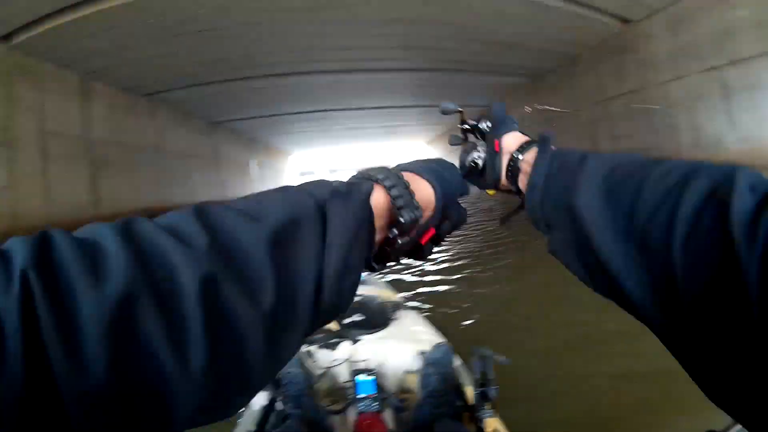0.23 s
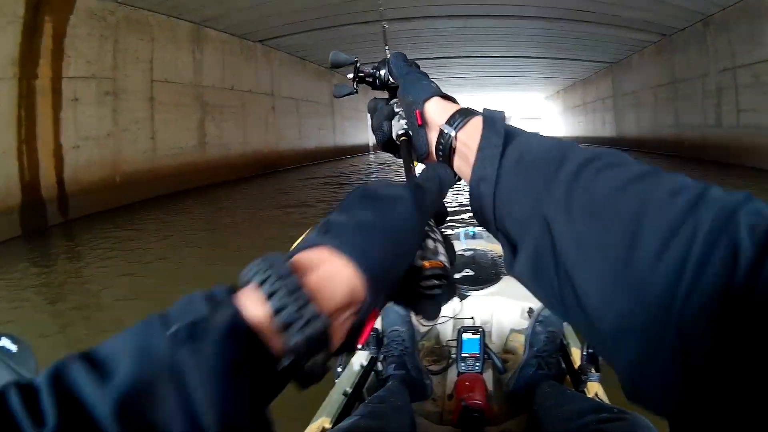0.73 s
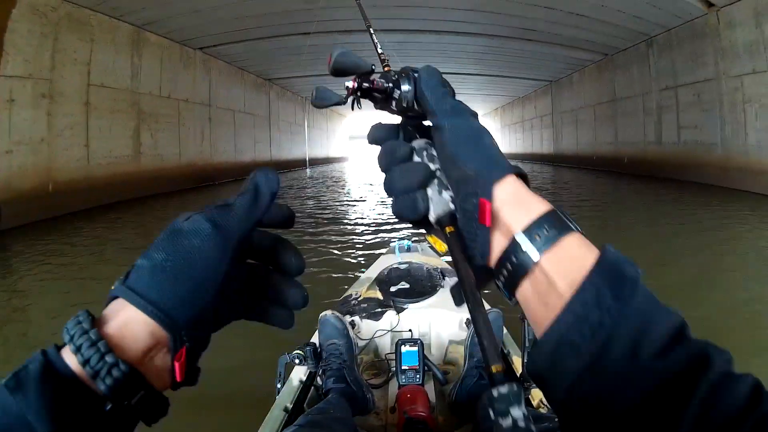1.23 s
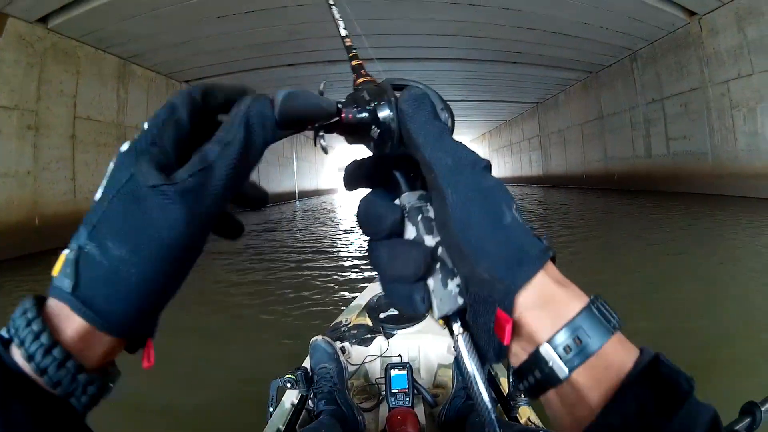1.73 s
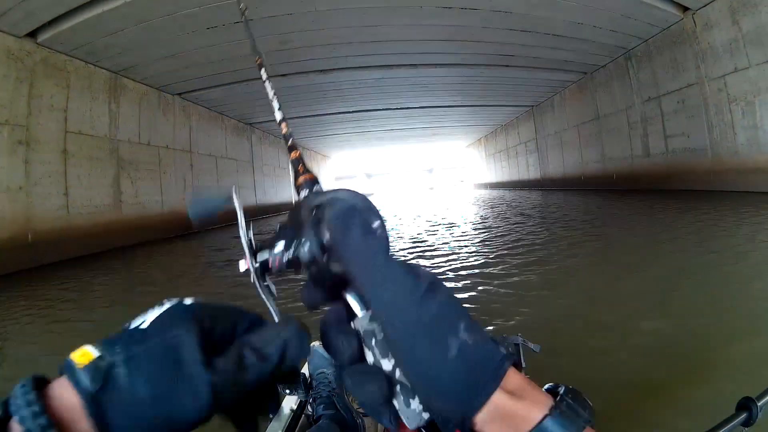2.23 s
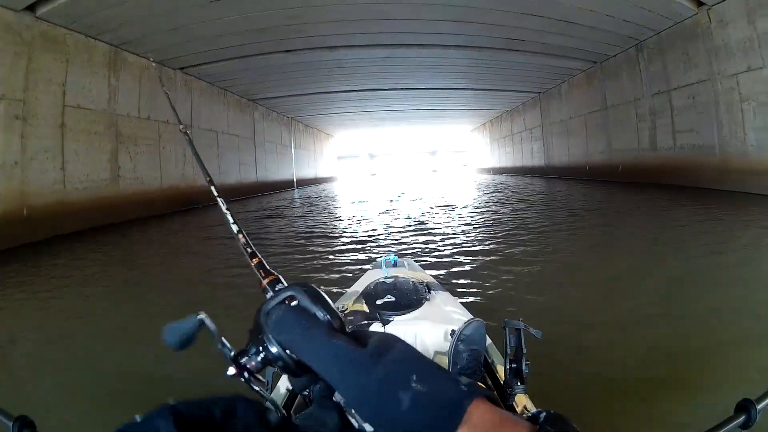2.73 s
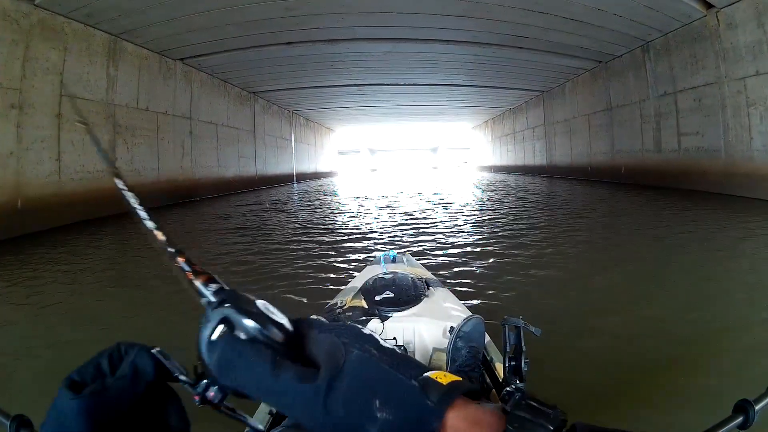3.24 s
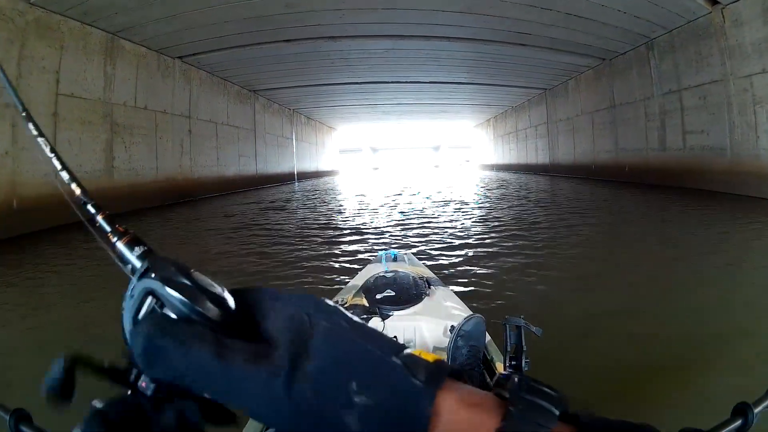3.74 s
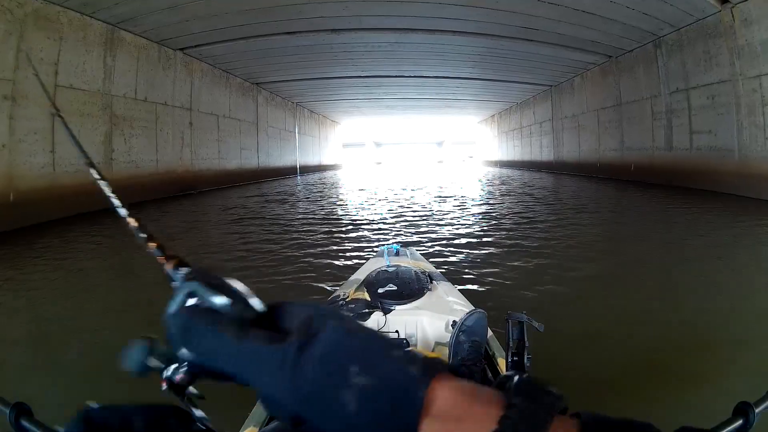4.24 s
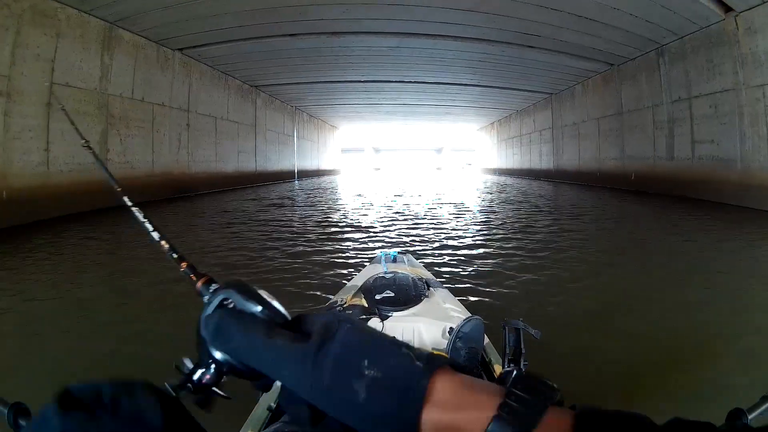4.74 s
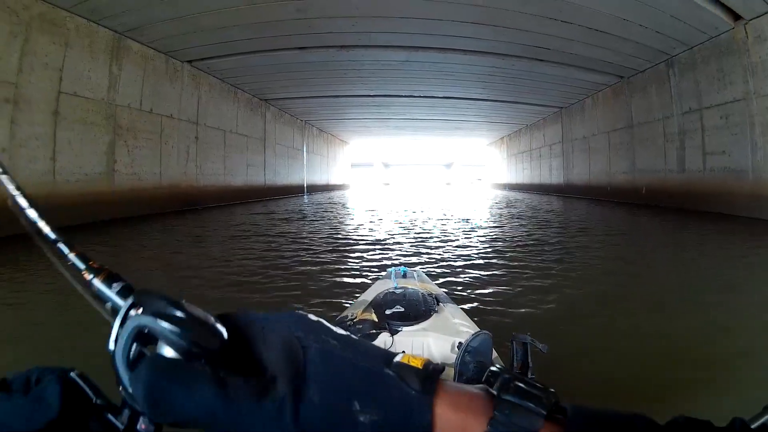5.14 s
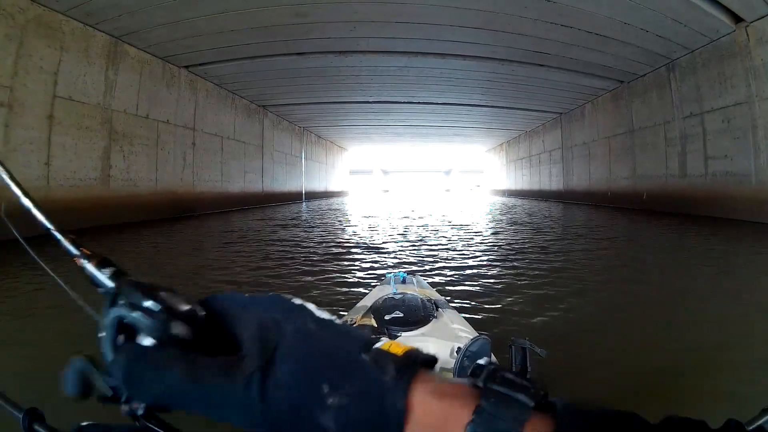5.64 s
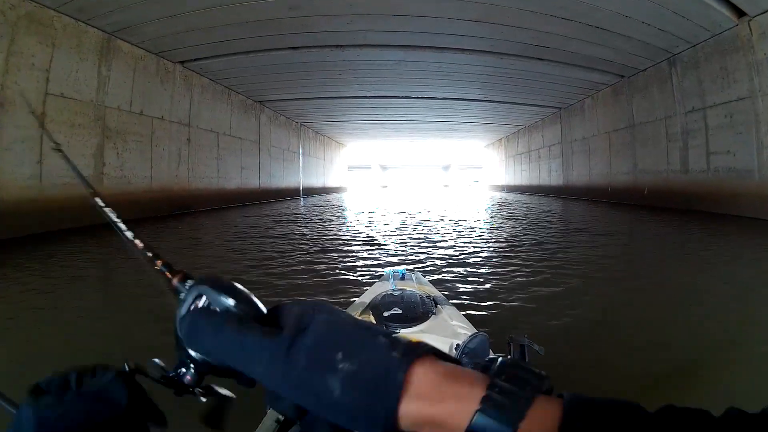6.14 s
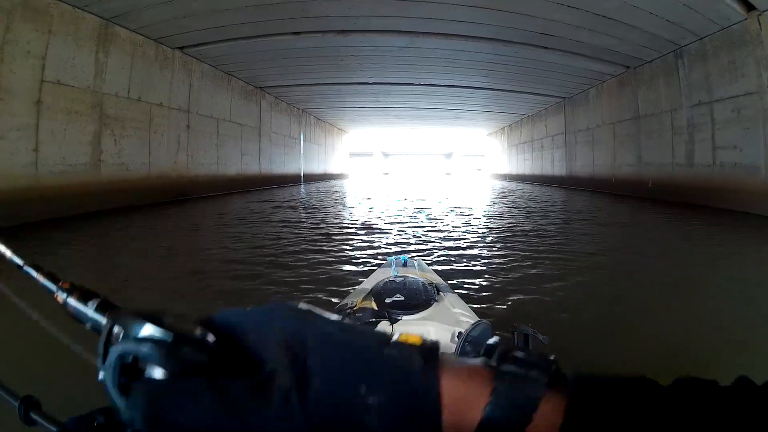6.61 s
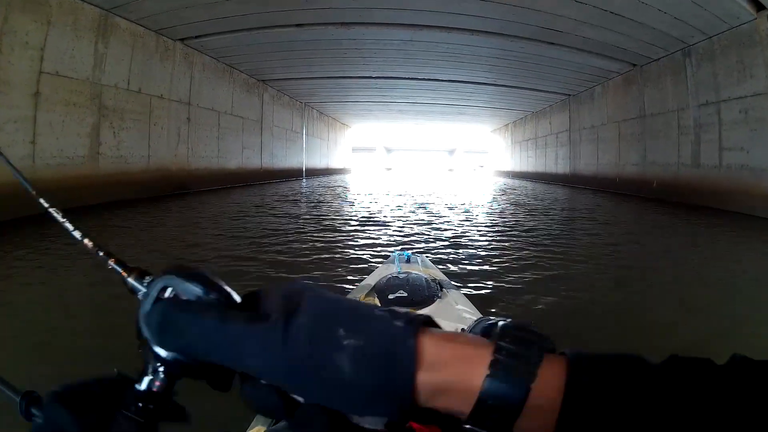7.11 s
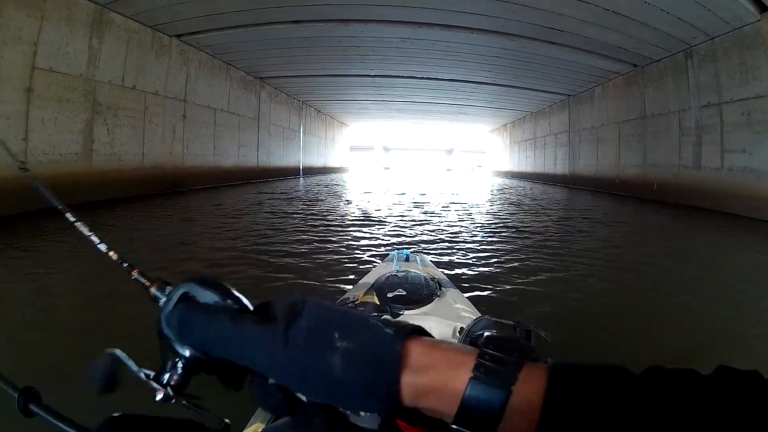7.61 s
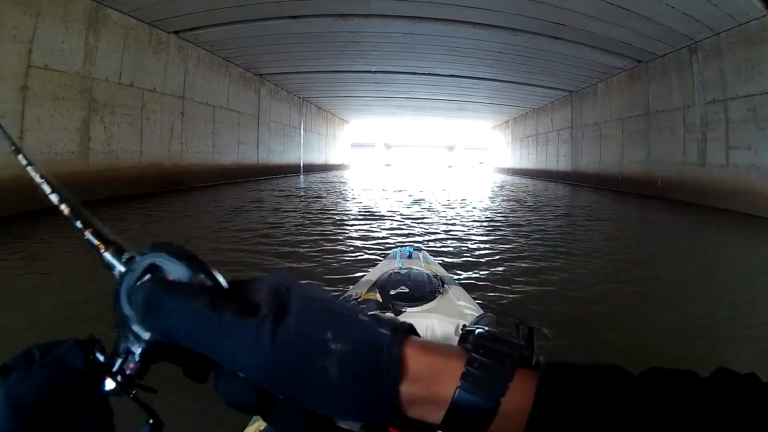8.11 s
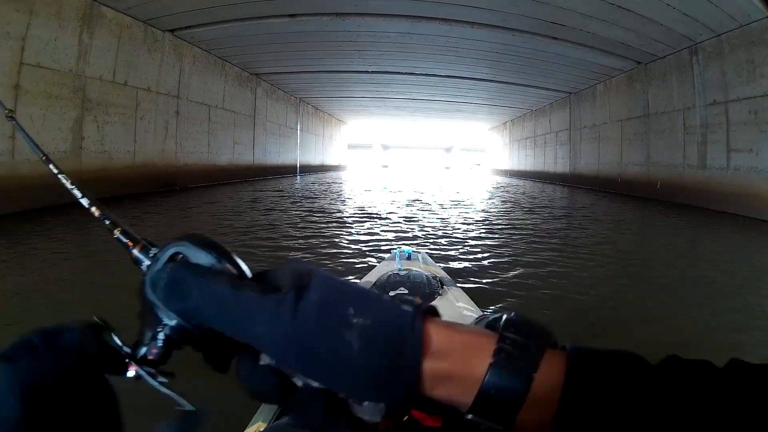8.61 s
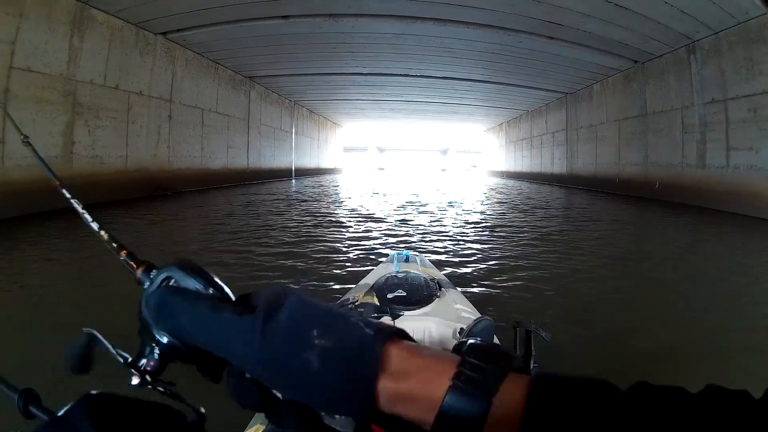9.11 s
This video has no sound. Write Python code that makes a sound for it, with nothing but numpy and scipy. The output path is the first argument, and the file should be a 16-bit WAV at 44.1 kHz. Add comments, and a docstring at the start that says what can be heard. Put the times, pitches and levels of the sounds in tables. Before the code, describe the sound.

A loud, steady rumble of traffic overhead fills a concrete tunnel, deep and droning with wavering engine hum. At the start a rod swing brings sleeve rustle, a dull boat thump and a hard knock, then line hisses out with rapid uneven spool ticks. Later only scattered reel clicks and knocks poke through. A body-worn camera adds hiss, a faint high whine and crackling overload.

```python
"""Traffic rumbles and drones through a concrete underpass, while an angler casts from a small boat.
The rod swishes, the boat thumps, line hisses out with quick spool ticks, and the reel and tackle knock.
Traffic, cast, line and glove are shaped noise, plus a wavering hum for the engines; each knock or tick
is a short burst that rings the reel's resonances. The chest-worn camera colours the steady sound,
adds hiss and a thin whine, clips the highest crests and cuts off the very top."""
import sys
import numpy as np
from scipy import signal
from scipy.fft import rfft, irfft, next_fast_len
from scipy.io import wavfile
from scipy.ndimage import uniform_filter1d, minimum_filter1d, map_coordinates

SR = 44100
rng = np.random.default_rng(int(sys.argv[2]) if len(sys.argv) > 2 else 0)


def to_wav(s):
    """Save 16-bit WAV."""
    ch = np.atleast_2d(s).T  # columns
    pcm = np.round(np.clip(ch, -1, 1) * 32767)  # PCM
    wavfile.write(sys.argv[1], SR, pcm.astype(np.int16))


N = 412776


def amp(db):
    """Turns decibels into a gain."""
    return 10 ** (np.asarray(db) / 20)


def unit(x):
    """Scales a sound to rms 1."""
    return x / np.sqrt(np.mean(x ** 2) + 1e-20)


def along(points, hz):
    """Reads a curve of (frequency, value) points on a logarithmic frequency axis."""
    f, v = np.transpose(points)
    return np.interp(np.log(hz + 1), np.log(f + 1), v)


def curves(rows):
    """Joins table rows over time: one curve for each column after the time."""
    times, *columns = np.transpose(rows)
    return [np.interp(np.arange(N) / SR, times, column) for column in columns]


def bumps(rows):
    """Adds up bell-shaped rises or dips, each (time, half length, height)."""
    t = np.arange(N) / SR
    return sum(height * np.exp(-((t - s) / half) ** 2) for s, half, height in rows)


def wobble(rate):
    """Draws a smooth random curve with `rate` random points a second."""
    return map_coordinates(rng.standard_normal(int(N * rate / SR) + 4), [np.arange(N) * rate / SR])


def filtered(x, response):
    """Multiplies the spectrum of a sound by a response to frequency."""
    m = next_fast_len(N + 8192)
    return irfft(rfft(x, m) * response(np.fft.rfftfreq(m, 1 / SR)), m)[:N]


def peak(f, hz, width):
    """Gives the strength of a resonance of height 1 at each frequency."""
    return np.abs(f * width / (hz * hz - f * f + 1j * f * width))


def rush(response, patchy_db):
    """Makes filtered noise of rms 1 whose gain varies in random patches of time and pitch."""
    z = signal.stft(rng.standard_normal(N), nperseg=512)[2]
    patches = uniform_filter1d(rng.standard_normal(z.shape), 5, 0)  # smooth across pitch
    patches = uniform_filter1d(patches, 14, 1)  # smooth across time
    noise = signal.istft(z * amp(patchy_db * unit(patches)), nperseg=512)[1][:N]
    return unit(filtered(noise, response))


def camera():
    """A steady hiss briefly grows louder five times, about once a second; electronics whine in two tones."""
    # hiss colour: (frequency [Hz], relative level [dB per Hz])
    hiss_colour = [(2350, -30.5), (4000, 1), (4290, -5.5), (6370, -9), (7030, -10), (7230, -10),
                   (14000, -12), (15800, -20)]
    # slow level of the hiss, to which the brief louder moments are added: (time [s], level [dB])
    hiss_level = [(0, -67), (1, -67), (2, -69.5), (3.4, -65), (4.9, -70), (6.2, -67.5), (6.6, -62.5),
                  (9.36, -65)]
    # average whine: (frequency [Hz], rms level [dB])
    whine_tones = [(6804, -72.5), (13608, -90)]
    first_s, gap_s, half_s, louder_by_db = 1.44, 1.008, .07, 3
    whine_follows = 0.44  # dB of whine for each dB of slow hiss change
    whine_rise = 1  # dB per second
    t = np.arange(N) / SR
    louder_db = sum(louder_by_db * np.exp(-((t - first_s - k * gap_s) / half_s) ** 4) for k in range(5))
    level_db, = curves(hiss_level)
    hiss = amp(level_db + louder_db) * rush(lambda f: amp(along(hiss_colour, f)), patchy_db=1)
    drift_db = whine_rise * (t - t.mean()) + whine_follows * (level_db - level_db.mean())
    whine = np.zeros(N)
    for hz, db in whine_tones:
        loudness = np.sqrt(2) * amp(db + drift_db + .8 * wobble(8))  # the root turns rms into peak
        whine += loudness * np.sin(2 * np.pi * hz * t + .3 * wobble(12))
    return hiss + whine


def traffic():
    """Wheels shake the deck; the tunnel's long echo smooths the noise into a drone with fixed resonances."""
    # colours of deep shudder, roar and tyre hiss: (frequency [Hz], relative level [dB per Hz])
    shudder_colour = [(8.8, -38), (15, -10.5), (43, 0), (68, 1), (108, -7), (190, -6.5), (250, -36.5),
                      (420, -120)]
    roar_colour = [(76, -41), (130, -11), (183, -8.5), (222, -6), (280, -4), (357, -4.5), (538, -3.5),
                   (763, -10.5), (1100, -29), (1430, -49.5), (2420, -120)]
    tyre_colour = [(470, -24.5), (800, 1.5), (1140, -9.5), (1380, -11), (1570, -17.5), (2290, -30),
                   (2600, -30.5), (3060, -41.5), (3740, -43.5), (6330, -57), (7000, -58), (9100, -72),
                   (15400, -120)]
    # the deck's main resonance: (frequency [Hz], width [Hz], level [dB])
    slab_modes = [(228.4, 26, 0)]
    # resonances across the tunnel that shape the roar: (frequency [Hz], width [Hz], lift or dip [dB])
    tunnel_modes = [(302, 30, 0.5), (360.6, 43, 5), (420, 49, -1), (541, 21, 3.5), (610, 10, 4)]
    # traffic overhead, before small random wavering: (time [s], roar level [dB], tyre hiss level [dB])
    flow = [(0, -21, -33), (.5, -17.5, -51.5), (1.1, -15, -29.5), (1.5, -17, -34), (2.3, -16.5, -32),
            (2.8, -13.5, -32), (3.15, -16.5, -32.5), (3.4, -15.5, -27), (4.2, -14.5, -28.5),
            (4.9, -14.5, -29.5), (5.25, -16.5, -31.5), (6.2, -17, -32.5), (6.6, -17, -28),
            (7.55, -14.5, -27), (8.2, -16.5, -30), (8.55, -15, -29.5), (8.95, -16.5, -29.5),
            (9.36, -18, -33.5)]
    # swells of the slab drone: (time [s], half length [s], rise [dB])
    drone_swells = [(.35, 0.22, 4.5), (1.3, 0.26, 2), (2.3, 0.33, 4.5), (3.15, 0.066, 6), (5.1, 0.53, 5.5),
                    (6.1, 0.27, 4), (7.65, 0.21, 4.5), (8.3, 0.26, 0.5), (9.1, 0.46, 3.5)]
    # surges of the engine hum: (time [s], half length [s], rise or dip [dB])
    hum_surges = [(.4, 0.18, 4), (1.12, 0.13, 11.5), (1.9, .2, 6), (2.5, .15, 4), (3.4, .4, -2.5),
                  (4.95, 0.22, 4.5), (5.37, .1, 13), (5.89, .25, 10.5), (6.29, .1, 15), (7.3, 0.38, 9),
                  (8.05, 0.21, 11), (9.13, .15, 6.5)]
    # a heavy vehicle lifts the shudder: (time [s], half length [s], rise [dB])
    heavy_vehicle = [(5.9, 0.61, 3.5)]
    shudder_start_db, shudder_fade = -22, 0.47  # the fade is in dB per second
    slab_db, hum_db, hum_hz = -24, -31, 41.7  # before swells, surges and wavering

    roar_db, tyre_db = curves(flow)
    pitch = hum_hz * (1 + .12 * wobble(9))  # many engines: the note wavers
    hum_level = amp(hum_db + bumps(hum_surges) + 3.6 * wobble(16))
    hum = hum_level * np.sin(2 * np.pi * np.cumsum(pitch) / SR)

    shudder_db = shudder_start_db - shudder_fade * np.arange(N) / SR + bumps(heavy_vehicle)
    shudder = amp(shudder_db) * rush(lambda f: amp(along(shudder_colour, f)), patchy_db=-0.5)

    def slab_response(f):
        return sum(amp(db) * peak(f, hz, w) ** 2 for hz, w, db in slab_modes)

    slab = amp(slab_db + bumps(drone_swells)) * rush(slab_response, patchy_db=1.14)

    def roar_response(f):
        modes_db = sum(db * peak(f, hz, w) ** 2 for hz, w, db in tunnel_modes)
        return amp(along(roar_colour, f) + modes_db)

    roar = amp(roar_db + 0.76 * wobble(7.5)) * rush(roar_response, patchy_db=0.87)
    tyre_level = amp(tyre_db + 0.37 * wobble(9))
    tyres = tyre_level * rush(lambda f: amp(along(tyre_colour, f)), patchy_db=1.27)
    return hum + shudder + slab + roar + tyres


def cast():
    """Sleeves and line rustle and the boat thumps under the swing; both build up, then sink to a trace."""
    # rustle colour: (frequency [Hz], relative level [dB per Hz])
    rustle_colour = [(710, -44.5), (1200, -4), (1570, -4.5), (1800, -8), (2200, -13), (2720, -24),
                     (4180, -31.5), (9000, -45), (11700, -69.5), (19800, -120)]
    start_s, rise_s, hold_s, fall_s = 0, 0.11, 0.68, 0.35
    rustle_db, thump_db = -35, -15  # before the gain of the swing
    times = np.cumsum([start_s, rise_s, hold_s, fall_s])
    swing_gain, = curves(np.transpose([times, [0.022, 0.84, 0.62, 0.057]]))
    grainy = amp(2.8 * wobble(90))
    rustle_noise = rush(lambda f: amp(along(rustle_colour, f)), patchy_db=1.5)
    rustle = amp(rustle_db) * unit(grainy * rustle_noise)
    thump = amp(thump_db) * rush(lambda f: peak(f, 68, 70) ** 2, patchy_db=1.0)
    return swing_gain * (rustle + thump)


def crested(rumble):
    """A smooth limit holds the rumble's waves down; here and there they pile up into one tall crest."""
    # crests, before the final clipping: (time [s], height [0-1 of full scale])
    crests = [(1.280, .76), (1.421, .75), (1.582, 0.9), (1.839, .74), (1.859, .75), (2.479, .75),
              (3.428, .92), (4.043, .87), (4.160, .77), (4.667, .86), (4.678, .77), (5.019, .77),
              (5.378, .93), (5.936, .75), (6.291, .76)]
    limit = .725  # of full scale
    t = np.arange(N) / SR
    room = np.minimum(1, limit / (np.abs(rumble) + 1e-9))
    rumble = rumble * uniform_filter1d(minimum_filter1d(room, size=201), size=151)
    for s, height in crests:
        near = slice(round((s - .003) * SR), round((s + .003) * SR))
        from_crest = t[near] - s
        pull = np.exp(-(from_crest / 0.0012) ** 4)  # 1 at the crest, 0 well away from it
        side = np.sign(rumble[round(s * SR)])
        crest = height * side * np.cos(2 * np.pi * 420 * from_crest)
        rumble[near] = (1 - pull) * rumble[near] + pull * crest
    return rumble


def glove():
    """A glove brushes softly on the rod grip: grainy noise, strongest near 5 kHz."""
    # strokes: (time [s], half length [s], level [dB])
    scuffs = [(0.094, 0.13, -57.5), (3.2, .04, -64), (3.55, 0.015, -61.5), (7.678, 0.065, -60),
              (8.59, 0.025, -58.5)]
    strokes = bumps([(s, half, amp(db)) for s, half, db in scuffs])
    noise = rush(lambda f: peak(f, 4900, 1500) ** 2 + .25 * peak(f, 8400, 900) ** 2, patchy_db=0.5)
    return strokes * unit(amp(2.9 * wobble(120)) * noise)


def line():
    """Line running through the rod's guides makes an uneven hiss in two broad bands."""
    # loudness of the running line: (time [s], level [dB])
    whirr = [(.39, -83.5), (.42, -68), (.5, -58.5), (.56, -62), (.59, -73.5), (.65, -65), (.7, -69),
             (.8, -68), (.9, -86.5)]
    level_db, = curves(whirr)
    noise = rush(lambda f: peak(f, 4600, 3500) + .5 * peak(f, 10500, 7000), patchy_db=3.5)
    return amp(level_db) * unit(amp(3.5 * wobble(220)) * noise)


def blow(out, s, part_db, t60):
    """Adds one contact to `out`: a push and its brief chatter ring the resonances of the reel's parts."""
    # one list each for body, frame, handle, small metal: (frequency [Hz], width [Hz], level [dB])
    reel_parts = [
        [(420, 290, 5.5), (784, 340, 5), (1054, 280, 5)],
        [(1870, 410, 7), (2370, 480, 0), (3030, 350, -0.5), (3710, 200, 1), (5550, 600, -7)],
        [(1220, 220, 3.5), (1820, 300, 1.5), (4400, 190, 4), (4900, 400, -5.5), (7740, 300, -20.5),
         (10300, 300, -30)],
        [(6760, 600, 1.5), (8400, 630, -5), (9350, 620, -3), (11400, 900, -4.5), (14000, 1800, -8.5)],
    ]
    size = 4096  # samples
    rise_s, push = .0004, 7.9  # the chatter builds up after a first push
    t, f = np.arange(size) / SR, np.fft.rfftfreq(size, 1 / SR)
    chatter = amp(-60 * t / t60) * (1 - np.exp(-t / rise_s)) * rng.standard_normal(size)
    burst = chatter + push * (t == 0)
    response = np.zeros(len(f), complex)
    for level_db, part in zip(part_db, reel_parts):
        for k, (hz, width, db) in enumerate(part):
            mode = 1j * f * width / (hz * hz - f * f + 1j * f * width)
            mode = mode / (1 + 1j * f / (1.57 * hz)) ** 2  # little sound above the resonance
            response += amp(level_db + db) * (-1) ** k * mode  # neighbours have opposite signs
    start = round(s * SR)
    out[start:start + size] += irfft(rfft(burst) * response)


def spool():
    """The spool ticks unevenly as line goes out; each part rings more or less by chance."""
    # ticks, before scatter and part levels:
    # (time [s], level [dB], extra for body, frame and handle [dB])
    tick_rows = [(.4205, -42.5, -1), (0.4342, -35.5, 2), (.4458, -35, 0), (.459, -42, 2), (.469, -43, 3),
                 (.476, -30.5, 12), (0.488, -43, 0), (0.4917, -34.5, 10), (.503, -41.5, 0),
                 (0.5073, -27.5, 2), (.5165, -38.5, -3), (.522, -28.5, 3), (.538, -32.5, 3),
                 (.551, -36.5, -2), (.5748, -43.5, -4), (.591, -45.5, -4), (.598, -49, -3),
                 (0.6066, -30, 0), (0.623, -36, 6), (.6275, -42, 5), (0.6366, -35, 7), (.651, -41.5, -3),
                 (.6645, -32, 2), (0.6681, -30.5, 9), (.673, -43, 2), (.681, -37.5, 1), (0.6983, -45.5, 0),
                 (0.7224, -35, 10), (0.7458, -45, 0), (.7715, -29.5, 3), (0.7896, -30, 0)]
    # levels added for body, frame, handle, small metal [dB]
    tick_parts = (-33, -2, -2, 3)
    scatter_db, t60, top_hz = 4.5, .008, 12000  # t60 in seconds; ticks are duller above the top
    ticks = np.zeros(N)
    for s, db, low_db in tick_rows:
        tick_db = db + low_db * np.array([1, 1, 1, 0]) + rng.normal(0, scatter_db, size=4)
        blow(ticks, s, tick_db + tick_parts, t60)
    return filtered(ticks, lambda f: 1 / (1 + 1j * f / top_hz) ** 2)


def tackle():
    """Knocks and clicks of reel and tackle: each contact rings the parts in its own mixture."""
    # knocks: (time [s], frame level [dB], body level [dB], handle level [dB], small metal level [dB],
    # time for the contact chatter to die by 60 dB [s])
    knock_rows = [(0.066, -23.5, -30, -46, -59.5, 0.012), (0.1586, -25, -10, -18.5, -52, 0.014),
                  (.1815, -7, 2, -22, -32.5, 0.0031), (0.192, -1.5, 17.5, -11.5, -9, .005),
                  (0.195, -9.5, 11, -16, -22.5, .006), (.2, -21, 4.5, -27, -40.5, 0.005),
                  (2.111, -33.5, -37, -43, -52, 0.035), (2.1748, -22.5, -20, -36, -32, 0.013),
                  (2.179, -31, -30, -38, -31.5, 0.011), (2.1848, -23, -24, -41, -33.5, 0.0083),
                  (2.1874, -27, -26, -41, -32.5, .009), (2.1932, -15.5, -20, -23, -15, 0.01),
                  (2.196, -19, -27, -32, -21, 0.01), (2.275, -35, -40, -42, -40.5, .013),
                  (2.786, -31.5, -40, -30.5, -54, .03), (3.155, -35, -37, -41, -53, 0.033),
                  (3.963, -29, -33, -42, -45, 0.011), (4.103, -33.5, -38, -42, -49, 0.017),
                  (4.332, -32, -33, -46, -45.5, 0.007), (4.387, -33.5, -39, -42, -42, .009),
                  (4.5915, -28.5, -35, -38, -43.5, .005), (6.6377, -4.5, 3, -6, -43.5, 0.01),
                  (6.641, -27, -1, -14, -42.5, .008), (6.83, -50, -43, -44, -39.5, .006),
                  (7.945, -42, -40, -47, -48, 0.0045), (8.4612, -15.5, -10, -5.5, -42, 0.014),
                  (8.596, -37, -31, -30, -55.5, 0.033), (9.143, -21.5, -4, -13.5, -58, 0.014)]
    knocks = np.zeros(N)
    for s, frame_db, body_db, handle_db, metal_db, t60 in knock_rows:
        blow(knocks, s, [body_db, frame_db, handle_db, metal_db], t60)
    return knocks


def scene():
    """Mixes everything at one microphone; traffic and cast come through the camera's case."""
    # camera case resonances: (frequency [Hz], width [Hz], lift or dip [dB])
    housing = [(2770, 360, 3), (3800, 540, 5.5), (5370, 580, 5.5), (8300, 600, -2), (11600, 900, -5)]

    def case(f):
        return amp(sum(db * peak(f, hz, w) ** 2 for hz, w, db in housing))

    rumble = crested(filtered(traffic() + cast(), case))
    return (camera() + rumble + glove() + line() + spool() + tackle())[None]


def record(dry):
    """Clips crests hard, which leaves faint ticks, then removes everything above the band limit."""
    clip, top_hz = .71, 15800  # clip level as a part of full scale
    return filtered(np.clip(dry[0], -clip, clip), lambda f: f < top_hz)[None]


dry = scene()
out = record(dry)
to_wav(out)
```